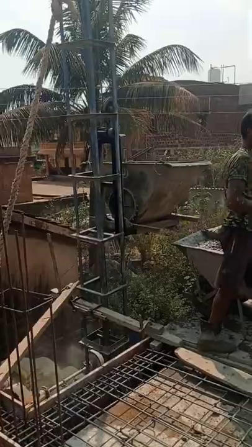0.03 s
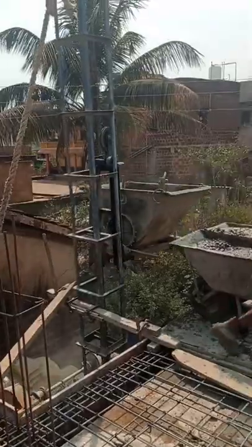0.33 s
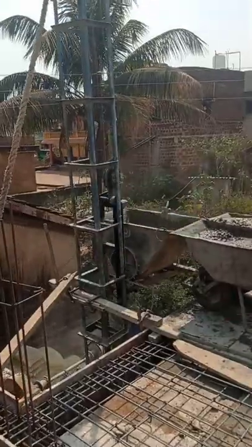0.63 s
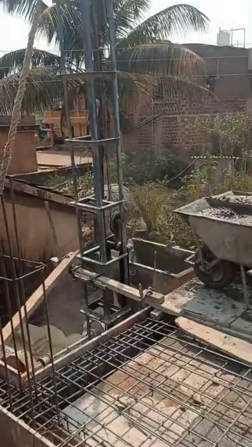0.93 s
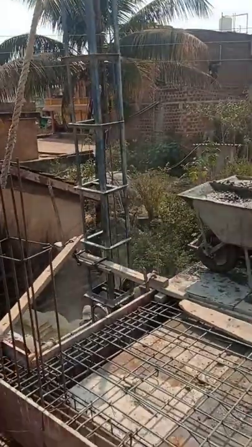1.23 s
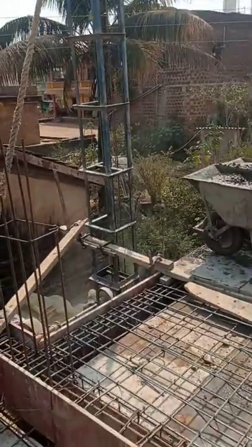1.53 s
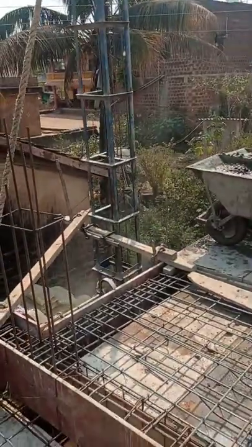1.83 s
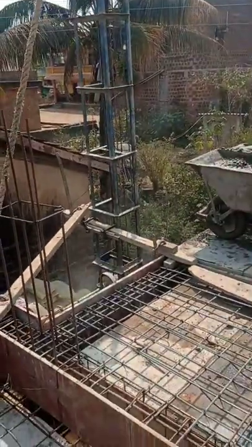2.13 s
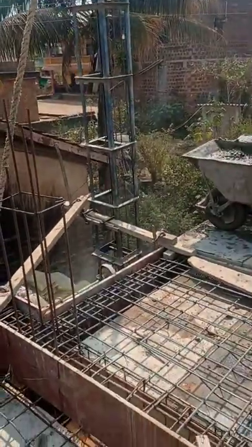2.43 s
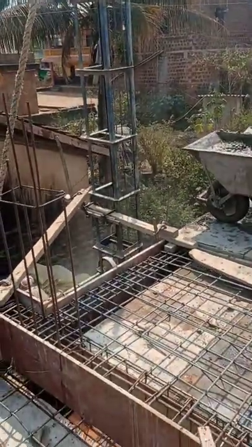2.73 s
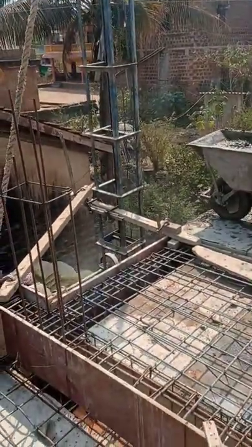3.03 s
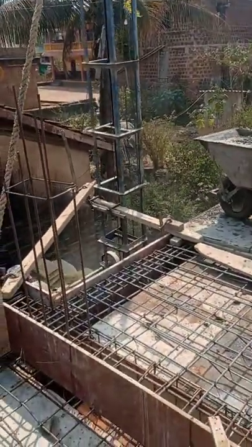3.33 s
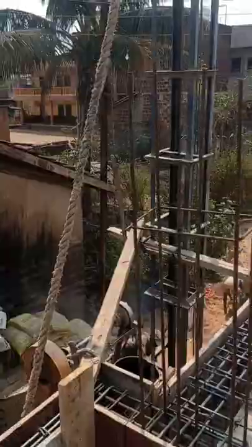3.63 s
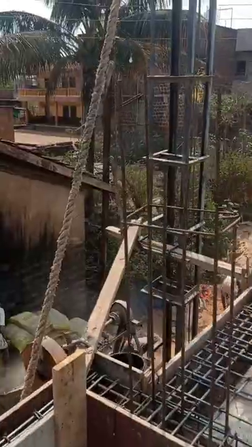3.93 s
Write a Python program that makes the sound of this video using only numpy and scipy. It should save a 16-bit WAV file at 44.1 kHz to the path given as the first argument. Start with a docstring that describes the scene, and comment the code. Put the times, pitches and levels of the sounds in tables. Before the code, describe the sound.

A single-cylinder engine chugs steadily, driving a rattling hoist winch on a building site.

```python
"""On a building site, a single-cylinder engine chugs at the foot of a hoist, echoing between walls.
Each firing excites the resonances of the exhaust pipe. The winch turns a little slower than the engine
fires: it hums, rattles, grinds its gear teeth and scrapes once a turn. The skip rolls down the mast in
the first two seconds; later the winch knocks and squeals briefly. Near the end the listening spot
changes at once, and the tone with it."""
import sys
import numpy as np
from scipy import signal
from scipy.fft import rfft, irfft, next_fast_len
from scipy.io import wavfile

SR = 44100
rng = np.random.default_rng(int(sys.argv[2]) if len(sys.argv) > 2 else 0)


def put_to_file(sound):
    """Save the sound as 16-bit audio at rate SR, in the file named by the first command-line argument."""
    columns = np.atleast_2d(sound).T  # one column per channel
    safe = np.clip(columns, -1, 1)
    whole_steps = np.round(safe * 32767)
    wavfile.write(sys.argv[1], SR, whole_steps.astype(np.int16))


N = 176400
T = np.arange(N) / SR

# engine speed (time [s], rate [firings/s])
FIRING_RATE = [(0, 12.65), (1.4, 12.67), (2.3, 12.679), (4, 12.679)]
# exhaust pipe resonances (frequency [Hz], bandwidth [Hz], gain [dB])
PIPE_MODES = [(152.1, 18.4, 0), (244.6, 20, 4), (298.3, 44.2, -3)]
# reflections from ground and walls (delay [s], gain [dB])
ECHOES = [(.0017, -4.5), (.0373, -7), (.053, -10)]
# engine turbulence (time [s], level [dB])
RUMBLE_LEVEL = [(.45, -28), (.7, -28.5), (2.1, -26), (2.35, -24.5), (2.5, -26.5)]
# its spectrum (frequency [Hz], gain [dB])
RUMBLE_SPECTRUM = [(25, -33.5), (52, -27.5), (80, -9), (112, -4.5), (160, -1), (215, -3), (285, -4),
                   (350, -7), (480, -22.5), (900, -56)]
# rattle of the casings (time [s], relative level [dB])
CLATTER_LEVEL = [(0.35, -32.5), (1.13, -30.5), (2.38, -32.5), (3.37, -31.5), (3.55, -28), (3.8, -33.5)]
# response of the casings (frequency [Hz], gain [dB])
CASING_RESPONSE = [(200, -25.5), (390, 1.5), (480, -4), (600, 1.5), (760, 0.5), (950, -4.5), (1080, -4.5),
                   (1200, -2), (1480, -7.5), (1680, -5.5), (2100, -12.5), (3000, -18.5), (4200, -27.5),
                   (9000, -58.5)]
# the skip's rollers on the mast (time [s], level [dB])
SKIP_LEVEL = [(0, -26.5), (.74, -40), (.88, -32.5), (1.25, -29.5), (1.45, -29), (1.7, -31.5), (3.7, -40.5)]
# their spectrum (frequency [Hz], gain [dB])
SKIP_SPECTRUM = [(300, -20.5), (500, -7.5), (780, 4.5), (1000, 0), (1950, 1), (2700, -6.5), (3800, -18),
                 (6200, -14), (8000, -40)]
# rollers striking mast joints (time [s], level [dB])
SKIP_CLANKS = [(1.012, -27.5), (1.037, -32), (1.232, -24)]
# winch speed (time [s], rate [turns/s])
WINCH_RATE = [(0, 11.17), (3.2, 11.215), (3.6, 11.32)]
# grinding of the gears (time [s], level [dB])
GRIND_LEVEL = [(0.8, -46), (1.29, -44), (2.02, -42.5), (3.42, -41)]
# its spectrum (frequency [Hz], gain [dB])
GRIND_SPECTRUM = [(2000, -12), (3300, 1.5), (4000, -2.5), (5200, -3.5), (6800, 1), (7800, -8.5),
                  (9000, -11), (10500, -24), (14000, -50)]
# fine sizzle of meshing teeth (time [s], level [dB])
SIZZLE_LEVEL = [(.35, -55.5), (1.25, -52.5), (1.4, -50), (1.7, -55.5), (2.5, -54.5), (4, -52)]
# its spectrum (frequency [Hz], gain [dB])
SIZZLE_SPECTRUM = [(4000, -14), (8500, -1.5), (10500, -6.5), (13800, -10), (14700, -2), (15400, 3),
                   (16000, -18)]
# hum of the winch drive (frequency [Hz], level [dB])
HUM_PARTIALS = [(89.8, -42), (185, -42), (393, -48), (448, -49)]
# slack knocking the winch housing (time [s], peak level [dB])
KNOCKS = [(1.501, -37), (1.596, -23), (1.779, -25), (2.585, -21), (2.686, -24), (2.853, -21.5),
          (3.122, -17.5), (3.386, -20)]
# housing resonances (frequency [Hz], bandwidth [Hz], gain [dB])
HOUSING_MODES = [(1194, 36, 2), (1670, 28, -6)]
# once-a-turn scrape (time [s], level [dB])
SCRAPE_LEVEL = [(.3, -51), (.69, -46), (.96, -46.5), (1.5, -50), (1.8, -44.5), (2.55, -44), (3.7, -47.5),
                (4, -41)]
# resonances of the scraped steel (frequency [Hz], bandwidth [Hz], gain [dB])
SCRAPE_MODES = [(1820, 100, -8), (2330, 130, 0), (2790, 260, 9), (4680, 330, 4.5), (5630, 240, -0.5),
                (6800, 350, 5.5)]
# resonances of the dry gears (frequency [Hz], bandwidth [Hz], gain [dB])
CHIRP_MODES = [(6010, 99, 5.5), (6570, 480, 4)]
# friction squeals (start [s], duration [s], frequency [Hz], level [dB])
SQUEALS = [(3.395, .06, 4270, -40), (3.42, .12, 4430, -43), (3.475, .03, 4390, -40),
           (3.613, .02, 6300, -38), (2.74, .02, 12900, -59)]
# ringing of the steel frame (time [s], level [dB])
FRAME_LEVEL = [(.35, -57), (1.8, -36.5), (2.4, -37), (3.7, -37.5), (4, -67)]
# frame resonances (frequency [Hz], bandwidth [Hz], gain [dB])
FRAME_MODES = [(552, 10, -2.5), (612, 47, -4), (775, 20, 0), (1192, 99, 5), (1682, 33, 8)]
# change of tone at the second listening spot (frequency [Hz], gain [dB])
SECOND_SPOT = [(90, -4.5), (150, 0.5), (195, -11.5), (252, 3), (320, -3.5), (430, 3), (650, -4),
               (1200, 1.5), (3150, -3.5), (4250, 5), (7000, -1.5), (13500, -5)]


def exhaust(firings, level_db=-24.5, low_cut_hz=78):
    """Resonance and reflection: each firing rings the pipe and returns from the ground and walls."""
    pulses = cyclic_clicks(firings, places=np.zeros(1), sizes=1, spread_db=0.9)
    puffs = resonate(pulses, PIPE_MODES)
    direct = signal.sosfilt(signal.butter(3, low_cut_hz, "high", fs=SR, output="sos"), puffs)
    reflected = sum(from_db(db) * delayed(direct, delay_s) for delay_s, db in ECHOES)
    return from_db(level_db) * low_pass(direct + reflected, hz=1800)


def rumble(firings, depth=0.095, lag_cycles=0.33):
    """Turbulence: the engine's low flow noise swells after each firing."""
    throb = 1 + depth * np.cos(2 * np.pi * (firings - lag_cycles))
    return from_db(in_time(RUMBLE_LEVEL)) * colour(throb * rng.standard_normal(N), RUMBLE_SPECTRUM)


def clatter(firings, winch_turns, depth=0.29, lag_turns=0.12):
    """Impact excitation: engine contacts, winch contacts and loose parts shake the casings."""
    throb = 1 + depth * np.cos(2 * np.pi * (winch_turns - lag_turns))
    loose_hits = from_db(-0.5) * grains(per_s=3500, spread_db=1.5) * throb
    engine_hits = from_db(-2) * contacts(firings, spread_db=2.0, count=90)
    winch_hits = from_db(-4) * contacts(winch_turns, spread_db=0.0, count=70)
    hits = engine_hits + winch_hits + loose_hits
    return from_db(in_time(CLATTER_LEVEL)) * np.std(hits) * colour(hits, CASING_RESPONSE)


def skip(clank_decay_s=0.021):
    """Rolling contact: rollers rattle down the steel mast and clank over its joints."""
    clanks = sum(from_db(db) * (T > s) * np.exp(-np.abs(T - s) / clank_decay_s) for s, db in SKIP_CLANKS)
    envelope = np.hypot(from_db(in_time(SKIP_LEVEL)), clanks)  # the powers add
    return envelope * colour(grains(per_s=3500, spread_db=2.0), SKIP_SPECTRUM)


def gears(winch_turns, teeth=12, grind_depth=0.15, sizzle_depth=0.55):
    """Amplitude modulation: friction noise pulses as each tooth meshes; the drive hums below."""
    mesh = rms_one(.5 + .5 * np.cos(2 * np.pi * teeth * winch_turns))
    coarse = grains(per_s=7000, spread_db=2.0) * (1 - grind_depth + grind_depth * mesh)
    fine = grains(per_s=8500, spread_db=7.5) * (1 - sizzle_depth + sizzle_depth * mesh)
    grind = from_db(in_time(GRIND_LEVEL)) * colour(coarse, GRIND_SPECTRUM)
    sizzle = from_db(in_time(SIZZLE_LEVEL)) * colour(fine, SIZZLE_SPECTRUM)
    hum = sum(from_db(db) * np.sqrt(2) * np.sin(2 * np.pi * (hz * T + rng.random()))
              for hz, db in HUM_PARTIALS)
    return grind + sizzle + hum


def knocks():
    """Impulse response: slack in the drive is taken up with a knock that rings the housing."""
    ring = resonate(signal.unit_impulse(N), HOUSING_MODES)
    return sum(from_db(db) * delayed(ring, s) for s, db in KNOCKS) / np.abs(ring).max()


def scrape(winch_turns, time_constant_s=0.0018, spread_db=1.5, wander_s=0.0004):
    """Frictional excitation: a high spot rubs once a turn, ringing each steel mode unevenly."""
    age = winch_turns % 1 / in_time(WINCH_RATE) / time_constant_s
    rub = age ** 2 * np.exp(-age) * rng.standard_normal(N)
    rings = sum(resonate(rub * from_db(spread_db * drift(per_s=12)), [mode]) for mode in SCRAPE_MODES)
    wavering = np.interp(T + wander_s * drift(per_s=50), T, rings)  # a varying delay bends the pitch
    return from_db(in_time(SCRAPE_LEVEL)) * low_pass(wavering, hz=8200)


def chirps(spread_db=2.5, relative_db=-5.5):
    """Modal resonance: the dry gears chirp in uneven bursts on their high modes."""
    bursts = 0
    for mode in CHIRP_MODES:
        friction = grains(per_s=2400, spread_db=0.5) * from_db(spread_db * drift(per_s=40))
        bursts += resonate(friction, [mode])
    return from_db(in_time(GRIND_LEVEL) + relative_db) * low_pass(bursts, hz=7500)


def squeals(wobble_hz=70, roughness=0.35):
    """Friction-induced vibration: brief, rough tones of unsteady pitch."""
    sound = 0
    for start, length, hz, db in SQUEALS:
        progress = np.clip((T - start) / length, 0, 1)
        swell = np.sqrt(np.abs(np.sin(np.pi * progress)))
        tone = np.sin(2 * np.pi * np.cumsum(hz + wobble_hz * drift(per_s=380)) / SR)
        sound += from_db(db) * swell * rms_one(tone * (1 + roughness * drift(per_s=120)))
    return sound


def frame():
    """Forced vibration: small random knocks keep the steel frame ringing."""
    ringing = resonate(grains(per_s=820, spread_db=4.5), FRAME_MODES)
    return from_db(in_time(FRAME_LEVEL)) * low_pass(ringing, hz=2160)


def cycles(rate, first_s):
    """Phase as the integral of rate, in cycles counted from first_s."""
    phase = np.cumsum(in_time(rate)) / SR
    return phase - np.interp(first_s, T, phase)


def cyclic_clicks(phase, places, sizes, spread_db):
    """Impulse train: clicks at the same places in every cycle, their strength scattered by spread_db."""
    when = np.arange(-1, int(phase[-1]) + 1)[:, None] + places
    strength = sizes * from_db(spread_db * rng.standard_normal(when.shape))
    inside = (when > phase[0]) & (when < phase[-1])
    return np.bincount(np.searchsorted(phase, when[inside]), strength[inside], N)


def contacts(phase, spread_db, count):
    """Periodic excitation: a machine's own pattern of small contacts recurs every cycle."""
    places = (np.arange(count) + rng.random(count)) / count
    return rms_one(cyclic_clicks(phase, places, rng.standard_normal(count), spread_db))


def grains(per_s, spread_db):
    """Shot noise: random clicks of uneven size; rms 1."""
    sizes = from_db(spread_db * np.minimum(rng.exponential(1, N), 4)) * rng.choice([-1, 1], N)
    return rms_one(sizes * (rng.random(N) < per_s / SR))


def drift(per_s):
    """Random modulation: a line through per_s random values a second; rms 1."""
    return rms_one(np.interp(T * per_s, np.arange(2000), rng.standard_normal(2000)))


def resonate(x, modes):
    """Modal superposition: parallel resonances with alternating signs."""
    return sum((-1) ** k * from_db(db) * signal.lfilter(*signal.iirpeak(hz, hz / width, fs=SR), x + 1e-18)
               for k, (hz, width, db) in enumerate(modes))


def equalise(x, gains):
    """Minimum-phase filtering: folding the cepstrum makes the given response causal."""
    size = next_fast_len(N + 8192, real=True)
    hz, db = np.transpose(gains)
    bin_hz = np.maximum(np.arange(size // 2 + 1) * SR / size, 1)
    magnitude = from_db(np.interp(np.log(bin_hz), np.log(hz), db))
    cepstrum = irfft(np.log(magnitude), size)
    cepstrum[1:size // 2] *= 2
    cepstrum[size // 2 + 1:] = 0
    return irfft(rfft(x, size) * np.exp(rfft(cepstrum)), size)[:N]


def colour(x, spectrum):
    """Spectral shaping; rms 1."""
    return rms_one(equalise(x, spectrum))


def low_pass(x, hz):
    """Steep attenuation above hz; rms 1."""
    return rms_one(signal.sosfilt(signal.butter(6, hz, fs=SR, output="sos"), x))


def delayed(x, delay_s):
    """Pure time delay."""
    return np.interp(T - delay_s, T, x, left=0)


def in_time(rows):
    """Linear interpolation of a control curve at every sample."""
    return np.interp(T, *np.transpose(rows))


def from_db(db):
    """Amplitude ratio of a level in decibels."""
    return 10 ** (np.asarray(db) / 20)


def rms_one(x):
    """Normalisation to unit power."""
    return x / np.sqrt(np.mean(x ** 2) + 1e-20)


def scene(move_s=3.725):
    """Superposition: engine, winch and skip heard from the roof slab, then from a second spot."""
    moved = T > move_s
    unbroken_firings = cycles(FIRING_RATE, first_s=0.0505)
    firings = unbroken_firings + 0.42 * moved  # the rhythms jump by part of a cycle at the move
    winch_turns = cycles(WINCH_RATE, first_s=0.059) + 0.07 * moved
    site = (exhaust(firings) + rumble(firings) + clatter(unbroken_firings, winch_turns) + frame()
            + skip() + gears(winch_turns) + chirps() + scrape(winch_turns) + knocks() + squeals())
    return np.where(moved, equalise(site, SECOND_SPOT), site)[None]


def record(dry, silence_s=0.13, fade_s=0.27, fade_from_db=-19, cutoff_hz=15800):
    """Gating and band limiting: the sound fades in after a brief silence, its highest treble cut."""
    gate = np.clip((T - silence_s) / 0.02, 0, 1)
    risen = np.clip((T - silence_s) / fade_s, 0, 1)
    fade = gate * from_db(fade_from_db * (1 - risen) ** 1.82)
    return signal.sosfilt(signal.ellip(12, .1, 90, cutoff_hz, fs=SR, output="sos"), dry * fade)


dry = scene()
out = record(dry)
put_to_file(out)
```